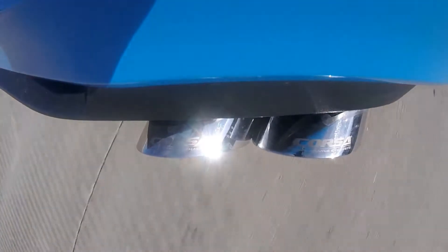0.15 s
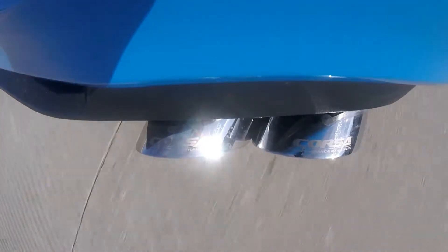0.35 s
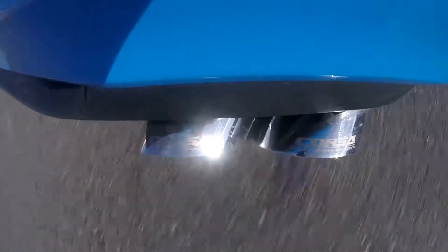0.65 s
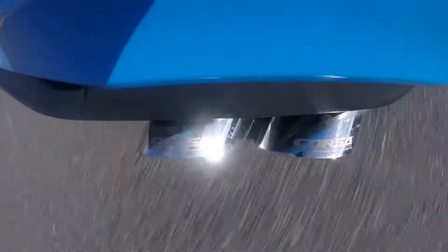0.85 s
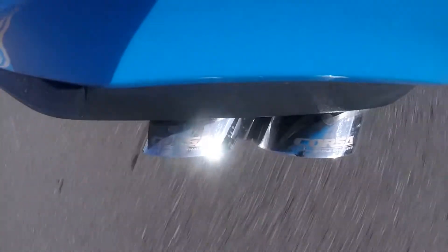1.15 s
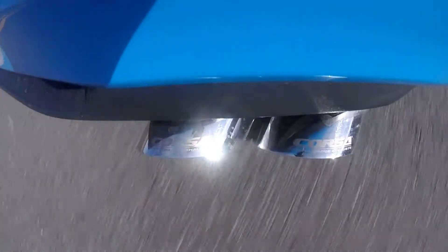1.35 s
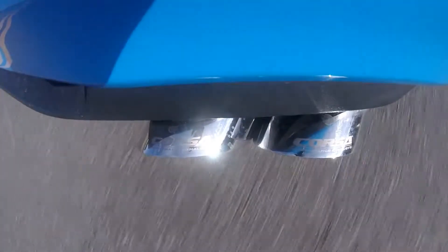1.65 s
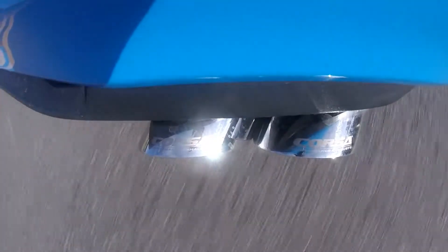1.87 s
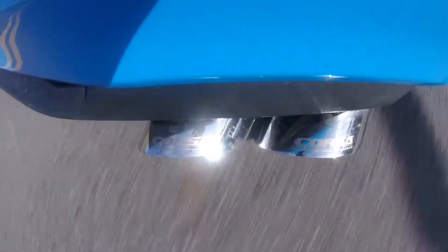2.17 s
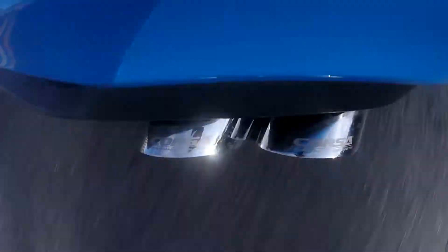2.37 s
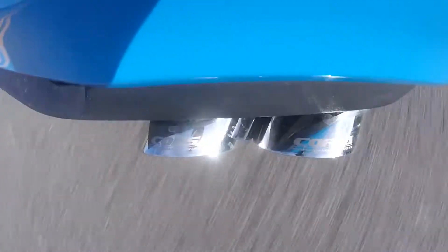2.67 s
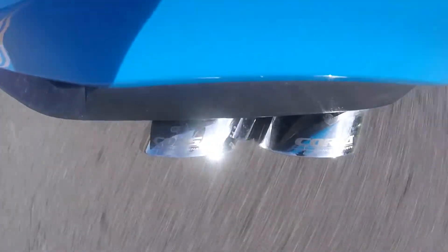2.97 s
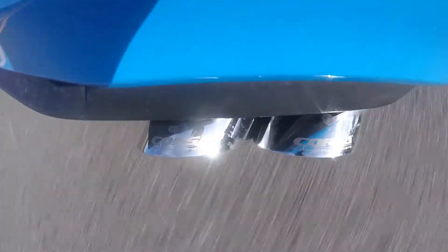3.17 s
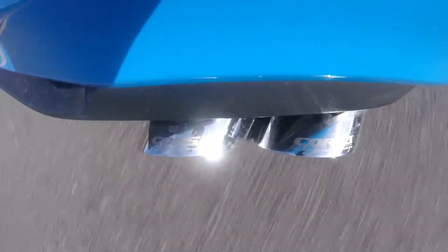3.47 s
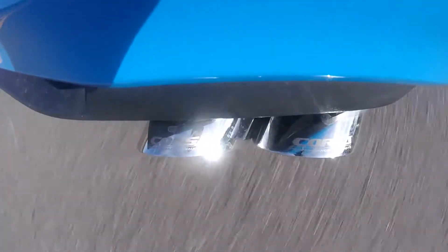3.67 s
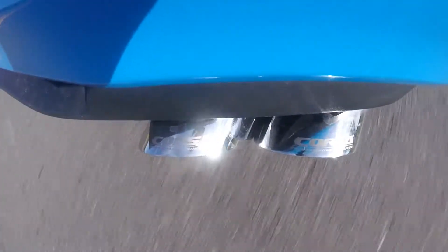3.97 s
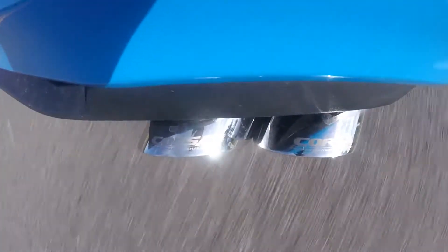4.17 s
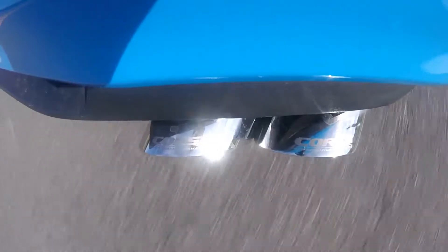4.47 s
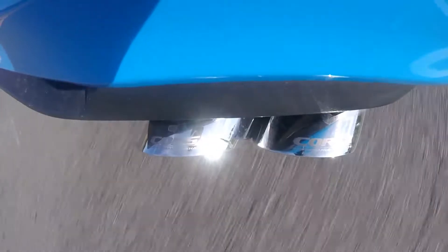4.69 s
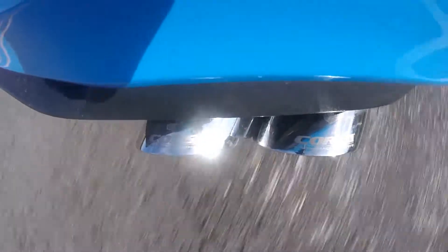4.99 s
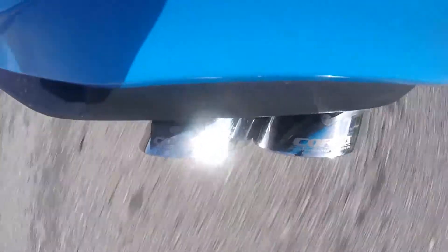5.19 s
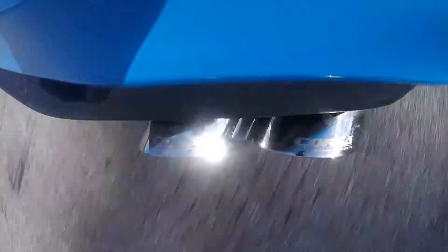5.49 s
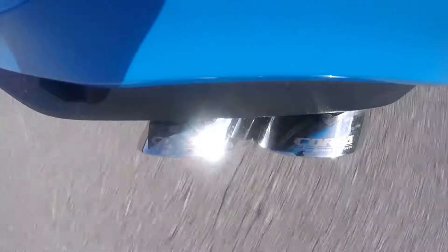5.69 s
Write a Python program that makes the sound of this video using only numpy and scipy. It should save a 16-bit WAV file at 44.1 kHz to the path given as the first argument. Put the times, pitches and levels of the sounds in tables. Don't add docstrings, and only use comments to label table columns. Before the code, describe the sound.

Outdoors on the road, a V8 exhaust heard very close and dry: a rising, tearing rasp with bright gas hiss, a sudden lift, loose stumbling pops, one brief throttle bark, a lull, then dense irregular crackling. From about three seconds it steadies into a throaty, lumpy drone that gradually slows, with low wind gusts and dull tyre roar around it.

```python
import sys
import numpy as np
from scipy import signal
from scipy.fft import rfft, irfft, next_fast_len
from scipy.io import wavfile
from scipy.ndimage import uniform_filter1d, map_coordinates

SR = 44100
rng = np.random.default_rng(int(sys.argv[2]) if len(sys.argv) > 2 else 0)


def attenuation_scalar(level_db):
    decades = np.asarray(level_db, float) / 20
    return 10 ** decades


def master(y):
    cut = np.clip(np.atleast_2d(y).T, -1, 1)
    pcm = np.round(cut * 32767)
    wavfile.write(sys.argv[1], SR, pcm.astype(np.int16))


N = 257544
TIME = np.arange(N) / SR
LIFT_S = .92

# (time [s], rate [Hz])
CYCLE_RATE = [(0, 35.948), (.8, 39.279), (1.3, 34.569), (1.4, 31.105), (1.5, 29.598), (1.6, 31.909),
              (1.7, 29.5), (1.82, 30.2), (1.9, 31.36), (2.0, 30.396), (2.5, 30.121), (2.8, 30.007),
              (3.05, 29.495), (3.2, 29.047), (3.5, 28.983), (4.75, 26.659), (5.1, 25.83), (5.84, 25.009)]
# (time [s], lead of the crank [ms])
CRANK_LEAD = [(3.2, 0), (3.28, -.7), (3.37, -.4), (3.45, 0), (3.61, 0), (3.75, .4), (3.97, 0), (4.33, 0),
              (4.5, .3), (4.75, .1), (4.9, .45), (5, .55), (5.057, .2), (5.135, -.9), (5.173, -.2), (5.21, .5),
              (5.25, .8), (5.3, .5), (5.36, 0)]
# (time [s], exhaust level [dB], gas flow as hiss level [dB])
LOAD = [(0, -18.5, -26.5), (.72, -19.5, -25.5), (.91, -19, -33.5), (.945, -27, -44.5), (1.05, -28, -56.5),
        (1.51, -27.5, -68), (1.58, -18, -51), (1.64, -13.5, -44.5), (1.8, -13, -42), (1.97, -21.5, -51),
        (2.56, -19.5, -58), (2.6, -15, -50.5), (2.78, -13.5, -53), (3.42, -13, -41.5), (4.15, -14, -49.5),
        (4.92, -12.5, -47), (5.03, -14.5, -46.5), (5.84, -14.5, -46.5)]
# (peak time [s], exhaust change [dB], hiss change [dB], decay time [s])
SURGES = [(1.093, 9, 18, 0.048), (1.328, 10.5, 18, 0.1), (1.431, 2.5, 6, 0.028), (1.69, -5.5, -7, 0.027),
          (1.72, 1.5, 9, 0.055), (1.79, -3.5, -2, 0.028), (2.081, 1.5, -5, 0.086), (2.813, 0.5, 13.5, 0.12),
          (2.928, -4.5, 3, 0.036), (3.119, -1.5, 7, 0.02), (3.222, 1.5, 5, 0.017), (3.249, -6.5, 1, 0.032),
          (5.068, 0.5, 2.5, 0.053)]
# (start [s], blend [s], firing pattern [0-12], timing scatter [firing gaps],
# front steepness [0 soft - 1 shock-like])
RUNNING = [(-1, .1, 0, .006, 1), (.81, .005, 1, .01, .9), (.915, .015, 2, .016, .15),
           (1.07, .08, 3, .01, .2), (1.32, .05, 4, .01, .2), (1.52, .05, 5, .012, .3),
           (1.69, .02, 6, .005, .8), (1.82, .07, 7, .008, .4), (1.95, .04, 8, .009, .1),
           (2.58, .04, 8.7, .1, .3), (3.2, .07, 9, .0012, .45), (3.5, 1.25, 11, .0018, .33),
           (4.84, .15, 11.9, .003, .65), (5.1, .15, 12, .001, .9)]

# (strength in tailpipe [dB], strength in muffler [dB], arrival lag [firing gaps])
FULL = [(-3, -0.6, .24), (4, 3, 0.16), (5, 5.5, .16), (1, -0.5, .28), (-8.5, -20, 0.068), (6.5, 6, .31),
        (-3, -1.24, .21), (2.5, 1.5, 0.12)]
EASE = [(-12, -12, .2)] * 8
CUT = [(-5.1, -4.9, .06), (-10.2, -7.1, -.22), (-4.6, -3.7, -.11), (-3.3, -3.3, .28), (-19.6, -36, .06),
       (-30, -17.3, -.02), (-1.2, -1.7, 0), (6.5, 6.6, -.05)]
COAST = [(-1, -2.5, .33), (-4, -3.5, 0.25), (-1.5, -2, 0.054), (1, 2, 0.19), (2, 1, 0.3), (-12, -15, 0.29),
         (-2, -2.5, 0.083), (1, 1, 0.0043)]
SAG = [(1.5, 0.5, -0.019), (-9.5, -4, 0.27), (1.5, 2, -0.12), (-0.5, 0.5, 0.28), (-1, -0.5, 0.29),
       (-12.5, -10.5, 0.18), (-4.5, 0.5, -0.18), (-7.5, -5.5, 0.13)]
CATCH = [(-8.5, -18.5, -0.053), (-7.5, -10.5, 0.062), (1.6, -0.5, -0.072), (-1, -3.5, 0.16),
         (-14, -38, -0.055), (-2, -11.5, 0.13), (-2, -5, -0.13), (-16.5, -10.5, 0.12)]
BLIP = [(-1, -1.3, .17), (0, -.3, .16), (1.2, .9, .14), (3, 2.5, .17), (.5, .2, .2), (-.7, -1, .2),
        (-.5, -.8, .14), (-1, -1.3, .15)]
FADE = [(-3.5, -2, -0.059), (-0.5, 0.5, 0.15), (-7.5, -6.5, -0.028), (2.5, 0.5, 0.16), (3, 1.5, 0.24),
        (2, 1.5, 0.19), (1.5, 0.5, 0.2), (-8.5, -5, -0.22)]
LIGHT = [(0.5, -1, 0.044), (-18.5, -8.5, .07), (-22.5, -8.5, -0.0054), (-1, -3, .06), (2.5, 5, .17),
         (-17, -8, -0.34), (-2, -5.5, -.06), (-8.5, -3.5, 0.19)]
PULL = [(.6, .7, -.03), (-17.6, -16, -.16), (-3, -3.2, -.37), (-5.7, -5.1, -.03), (.3, .1, .05),
        (.4, -.7, .36), (-6.4, -8.3, -.35), (.5, -.2, -.3)]
DRONE = [(-3, -1, -0.12), (-10, -12, -0.27), (-1.5, -3, -0.42), (-8, -5.5, -.03), (-4, -2.5, .03),
         (4.5, 3.5, .32), (-9.5, -12, -0.42), (1, 0.05, -.41)]
CRUISE = [(-2, -1.5, 0.084), (-10, -16, -0.48), (-3.5, -4.5, -.33), (-9, -4.5, -0.014), (-1.5, -0.5, 0.12),
          (3, 0.5, 0.35), (-13.5, -14.5, -.42), (-4, -6.5, -.52)]
BURBLE = [(2.5, 2.2, -.03), (-11.7, -10.9, -.26), (-5, -5.4, -.33), (-30, -16.3, -.06), (3.2, 2.9, .03),
          (-4.4, -7.6, .3), (-5, -6.6, -.48), (-7.2, -7.4, -.38)]

# (pressure peak time [s], strength [dB])
EASING = [(.8088, 7), (.8124, -3.5), (.8191, 1.6), (.8218, -.8), (.8247, -1), (.8284, -3), (.831, .8),
          (.8342, 6), (.8382, -3), (.8444, 1.6), (.8473, -.5), (.8504, .8), (.8542, -1), (.8568, -2.7),
          (.86, 3.2), (.864, -.8), (.8703, -2), (.8732, -3.7), (.8763, -1), (.8802, .2), (.886, 1.4),
          (.89, 0), (.8941, -4.8), (.9023, -.5), (.9062, .4), (.9121, 1.8), (.9163, .6), (.9205, -1)]
# (pressure peak time [s], strength [dB])
BANGS = [(.9284, -5), (.9548, -3), (.9641, 4), (1.0349, 7.5), (1.0449, -3), (1.0624, 3), (1.073, 4),
         (1.0769, 2), (1.0836, 1), (1.0898, -1.5), (1.1055, 3), (1.1174, -4), (1.1275, 3), (1.1552, 3),
         (1.1826, 5), (1.2438, 4), (1.2474, 4), (1.2571, 3), (1.276, 4), (1.2823, -4), (1.301, 4.5),
         (1.3049, 4), (1.3257, -3), (1.3302, 4.5), (1.3447, -4), (1.3599, 4.5), (1.3646, -3), (1.4111, 4),
         (1.4273, 5.5), (1.4606, 5), (1.4942, 7), (1.6093, 2), (1.6535, 3), (1.6613, 0), (1.6857, 5),
         (1.7098, 4.5), (1.7139, 2), (1.7185, 6.5), (1.7232, -1), (1.7271, 1), (1.7312, -2), (1.7523, 5),
         (1.7818, 3), (1.7861, 6.5), (1.8151, 2), (1.8193, 4.5), (1.8438, 4), (1.852, 5.5), (1.8716, -3),
         (1.8844, 3), (1.9205, 2), (1.9485, 3), (1.9856, -4), (2.0846, 11.5), (2.1175, 6), (3.2549, 4)]
# (pressure peak time [s], strength [dB])
CRACKLE = [(2.6133, 8.4), (2.6472, 3), (2.6763, 1.5), (2.6803, 1.7), (2.686, 1.0), (2.6968, 1.4),
           (2.7084, 4.6), (2.7217, 1.6), (2.7314, 1.0), (2.7359, 3.0), (2.7426, 4.8), (2.7474, 2.0),
           (2.7541, 0.0), (2.7591, 5.1), (2.7693, 2.6), (2.7766, 1.1), (2.7965, 1.3), (2.8055, 2.2),
           (2.8108, 3.8), (2.8154, 0.4), (2.8193, 4.1), (2.8242, 7.0), (2.8307, 4.4), (2.8386, 1.5),
           (2.8433, -0.2), (2.852, 0.9), (2.8758, 2.0), (2.8802, 4.5), (2.8861, 2.5), (2.9486, 2.9),
           (2.9536, 6.5), (2.9643, 2.8), (2.9816, 1.4), (2.987, 6.3), (3.0062, 2.0), (3.0159, 4.9),
           (3.0275, 0.3), (3.0322, 5.0), (3.0442, 5.2), (3.0491, 0.7), (3.0661, 1.8), (3.0705, -0.1),
           (3.0782, -0.1), (3.1012, 1.4), (3.1127, 6.0), (3.1172, 5.7), (3.1267, 2.3), (3.1332, 2.3),
           (3.1386, 0.1), (3.1475, 0.9), (3.1519, 2.6), (3.1633, 2.9), (3.1681, 1.0), (3.1807, 0.4),
           (3.1851, 5.0), (3.1909, 7), (3.2156, 1.3), (3.2207, 7.9)]
# (time [s], peak level [dB], treble
# level [dB])
POPS = [(1.0814, -28.5, -42), (1.1076, -41, -36), (1.303, -35.5, -45), (1.72, -37.5, -33),
        (1.7528, -29.5, -45.5), (2.816, -29.5, -44.5), (2.932, -37, -26), (3.118, -55, -30),
        (3.2078, -25, -62), (3.2188, -36, -37.5), (3.3602, -31, -45), (4.995, -44.5, -25.5),
        (5.8374, -63, -35)]

# (frequency [Hz], width [Hz], level [dB])
TAILPIPE = [(547, 158, 6.9), (651, 972, 7.8), (999, 1500, 1)]
MUFFLER = [(239, 101, 6), (469, 149, -6.6)]
# (gain [ratio], delay [s])
ECHOES = [(-.21, .00356), (.1, .00621)]
# (frequency [Hz], level [dB])
BUMPER = [(110, -3.5), (180, 0.5), (240, 0.5), (320, -2), (430, -2.5), (560, -1.5), (720, 2.5), (950, 1),
          (1300, -5)]
# (frequency [Hz], level [dB])
TIPS = [(110, -2.5), (180, -.5), (250, 0.01), (330, -4), (450, -5), (560, -1), (700, 5.5), (850, 2),
        (1000, -2), (1300, -4)]
# (time [s], share [0-1])
RINGING = [(0, 0.045), (.7, 0.085), (.9, 0.21), (1.2, .1), (1.55, 0.091), (1.68, .3), (1.72, 0.75),
           (1.9, 0.54), (2.0, .1), (2.55, .1), (2.7, .5), (3.1, 0.36), (3.4, 0.087), (4.3, .15),
           (4.9, 0.089), (5.84, 0.08)]

# (frequency [Hz], density [dB per Hz])
RASP = [(470, 2), (800, 7.5), (953, 1), (1170, 1), (1280, -6), (1430, 3), (1720, 2.5), (2140, -39),
        (2400, -39), (3120, -71), (5280, -120)]
SNAP = [(440, -21), (750, -1), (900, 3.5), (977, 9.5), (1070, -1), (1200, -0.5), (1300, 7), (1400, 5),
        (1830, -7), (2300, -31), (3500, -44), (4550, -83), (7700, -120)]
# (frequency [Hz], density [dB per Hz])
JET = [(1060, -26), (1800, 2.5), (2150, -6.5), (2330, -2), (2790, -6.5), (3230, -2.5), (3500, -6.5),
       (3920, -1.5), (4310, -10), (4770, -16), (6480, -19), (8420, -71.5), (14300, -120)]
DRAUGHT = [(1100, -30), (1800, -7), (2300, -14.5), (2700, -14), (3750, -16.5), (4570, -26.5), (5230, -33),
           (6500, -31), (6900, -50.5), (9000, -93)]
# (frequency [Hz], density [dB per Hz])
AIR = [(6300, -73), (6900, -3.5), (8000, 2), (9500, -6.5), (11300, -1), (12600, -7.5), (14000, -27.5),
       (15600, -6), (16500, -74)]
# (frequency [Hz], density [dB per Hz])
BUFFET = [(8.8, -37.5), (15, -8), (32, -2), (59, -5), (81, 1), (113, -14), (135, -5), (180, -23),
          (300, -120)]
ROAD = [(59, -36.5), (100, -13), (135, -33), (182, -25.5), (210, -6), (370, -7.5), (664, -2.5),
        (1080, -15.5), (3000, -32), (3900, -81.5), (6600, -120)]

# (time [s], level [dB])
WIND = [(0, -35), (.9, -38), (1.46, -31), (1.75, -38), (2.5, -35), (2.62, -27.5), (3.1, -25), (3.3, -34),
        (5.0, -27.5), (5.7, -39), (5.84, -34)]
# (peak time [s], rise over the wind [dB], width [s])
GUSTS = [(.16, 3, 0.16), (.49, 7, 0.081), (.67, 10.5, 0.063), (2.47, 5, 0.0252), (3.16, 5.5, 0.065),
         (3.36, 10, 0.085), (3.58, 8.5, 0.063), (4.0, 7, 0.089), (4.319, 5, 0.16), (4.791, -2, 0.029),
         (4.94, 5, 0.026), (5.119, 1.5, 0.032), (5.29, 7.5, 0.032)]
# (time [s], level [dB])
ROLLING = [
    (0, -38),
    (.9, -34),
    (1.1, -35),
    (2.6, -36),
    (3.2, -32),
    (3.5, -37),
    (5.84, -38),
]


def exhaust():
    front_full_s, front_part_s = .0009, .0012
    shock_full, shock_part, shock_steep = 1.1, .85, .8
    calm_timing = .004
    jet_lead = 20
    body_db, snap_db, jet_db, air_db = load()
    fired = np.array(firings())
    t, ring_db, boom_db = fired
    open_throttle = t < LIFT_S

    body = pipework(*fired[:, open_throttle], heat=1.14) + pipework(*fired[:, ~open_throttle], heat=0.95)
    ringing = np.clip(curves(RINGING)[0], 0, 1)
    body = (1 - ringing) * coloured(body, BUMPER) + ringing * coloured(body, TIPS)

    front = t + np.where(open_throttle, front_full_s, front_part_s)
    grows = np.where(open_throttle, shock_full, shock_part + shock_steep * running(t)[2])
    shock = pulses(front, attenuation_scalar(grows * np.maximum(ring_db, boom_db)))
    puff = np.abs(signal.fftconvolve(shock, attenuation_scalar(-60 * TIME[:900] / .014))[:N])
    _, timing, steep = running()
    calm = np.clip(1 - timing / calm_timing, 0, 1)
    gate = 2 - 1.4 * steep + 1.6 * calm + steady(puff)

    def hiss(spectrum):
        return steady(coloured(gate * rng.standard_normal(N), spectrum))

    def edge(spectrum, noise):
        return steady(causal(shock, spectrum)) * np.sqrt(1 - noise ** 2) + noise * hiss(spectrum)

    full_load = TIME < LIFT_S
    snap = np.where(full_load, edge(RASP, .15), edge(SNAP, .45 - .4 * steep - .1 * calm))
    full_jet = edge(JET, .48)
    part_jet = np.roll(edge(DRAUGHT, .98 - .22 * steep - .06 * calm), -jet_lead)
    jet = np.where(full_load, full_jet, part_jet)

    snap_db = snap_db + np.where(full_load, 0, 5 * (steep - .45))
    jet_db = np.maximum(jet_db, -62)
    air_db = air_db + 1.5 * wobble(14)
    return attenuation_scalar(body_db) * steady(body) + attenuation_scalar(snap_db) * snap + attenuation_scalar(jet_db) * jet + attenuation_scalar(air_db) * hiss(AIR)


def firings():
    start_cycle = -.141
    scatter_db, scatter_max_db = 9.5, 3
    misfire_db = -2.5
    bang_muffler_db, crackle_muffler_db = -.2, -.3
    hot_lead_s, lead_s = .0009, .0013

    gaps = 8 * (start_cycle + np.cumsum(curves(CYCLE_RATE)[0]) / SR)
    k = np.arange(int(gaps[0]), int(gaps[-1]) + 2)
    state, timing, _ = running(np.interp(k, gaps, TIME))
    patterns = np.transpose([FULL, EASE, CUT, COAST, SAG, CATCH, BLIP, FADE, LIGHT, PULL, DRONE, CRUISE, BURBLE])
    ring_db, boom_db, lag = [map_coordinates(column, [k % 8, state], order=1) for column in patterns]

    size_db = np.minimum(scatter_db * np.sqrt(timing), scatter_max_db)
    luck = rng.standard_normal((len(k), 3))
    ceiling = np.where(timing > .05, misfire_db, 20)
    ring_db = np.minimum(ring_db + size_db * luck[:, 0], ceiling)
    boom_db = np.minimum(boom_db + size_db * (.93 * luck[:, 0] + .3 * luck[:, 1]), ceiling)
    t = np.interp(k + lag + timing * luck[:, 2], gaps, TIME)
    t = t - curves(CRANK_LEAD, t)[0] / 1000

    s, db = np.transpose(EASING + BANGS + CRACKLE)
    share_db = np.repeat([bang_muffler_db, crackle_muffler_db], [len(EASING + BANGS), len(CRACKLE)])
    s = s - np.where(s < LIFT_S + hot_lead_s, hot_lead_s, lead_s)
    near = np.abs(t[:, None] - s).argmin(axis=0)
    hard = s, db, db + share_db
    return [np.append(np.delete(usual, near), extra) for usual, extra in zip((t, ring_db, boom_db), hard)]


def running(at=TIME):
    ends = [(s + blend, *state) for s, blend, *state in RUNNING]
    starts = [(new[0], *old[2:]) for old, new in zip(RUNNING, RUNNING[1:])]
    return curves(sorted(ends + starts), at)


def load():
    full_db, part_db = -27.5, -14.5
    body_db, jet_db = curves(LOAD)
    for s, more_db, hiss_db, decay_s in SURGES:
        shape = np.exp(-np.abs(TIME - s) / decay_s)
        body_db = body_db + more_db * shape
        jet_db = jet_db + hiss_db * shape
    under = jet_db - full_db
    rasp_db = -22 + 1.3 * under
    part_snap_db = jet_db + 7 + 0.41 * (body_db - part_db)
    snap_db = np.where(TIME < LIFT_S, rasp_db, part_snap_db)
    air_db = np.maximum(-55.5 + 1.4 * under, -73 + .4 * under)
    return body_db, snap_db, jet_db, air_db


def pipework(t, ring_db, boom_db, heat):
    ring = duct(TAILPIPE, chamber_hz=230.5, width_hz=89)
    boom = duct(MUFFLER, chamber_hz=470, width_hz=1270)

    def outlet(f):
        ends = 1 + sum(g * np.exp(-2j * np.pi * f / heat * s) for g, s in ECHOES)
        return ends / (1 + (118 / (f + 1)) ** 7) / (1 + (f / heat / 1150) ** 4)

    tailpipe = filtered(pulses(t, attenuation_scalar(ring_db - 7.4)), lambda f: ring(f / heat) * outlet(f))
    muffler = filtered(pulses(t, attenuation_scalar(boom_db - 4.3)), lambda f: boom(f / heat) * outlet(f))
    return tailpipe + muffler


def duct(modes, chamber_hz, width_hz):
    def pole(f, centre, width):
        return centre * centre - f * f + 1j * f * width

    def response(f):
        pipe = sum((-1) ** k * attenuation_scalar(db) * 1j * f * w / pole(f, c, w) for k, (c, w, db) in enumerate(modes))
        return pipe * chamber_hz ** 2 / pole(f, chamber_hz, width_hz)

    return response


def pops():
    low, top = np.zeros(N + 900), np.zeros(N + 900)
    t = TIME[:900]
    for s, db, top_db in POPS:
        at = min(round((s + .002) * SR), N - 60)
        burst = attenuation_scalar(db - 60 * t / .004) * rng.standard_normal(900)
        low[at:][:900] += burst
        top[at:][:900] += burst * attenuation_scalar(top_db)
    return attenuation_scalar(18.0) * coloured(low[:N], JET) + attenuation_scalar(9.5) * coloured(top[:N], AIR)


def wind():
    buffet = unit(attenuation_scalar(0.44 * wobble(11)) * coloured(rng.standard_normal(N), BUFFET))
    road = unit(coloured(rng.standard_normal(N), ROAD))
    gust_db = sum(db * np.exp(-((TIME - s) / width) ** 2) for s, db, width in GUSTS)
    buffet_db = curves(WIND)[0] + gust_db
    road_db = curves(ROLLING)[0] + 0.86 * wobble(0.43)
    return attenuation_scalar(buffet_db) * buffet + attenuation_scalar(road_db) * road


def unit(x):
    return x / np.sqrt(np.mean(x ** 2) + 1e-20)


def steady(x):
    power = uniform_filter1d(uniform_filter1d(x ** 2, size=3000), size=3000)
    return x / np.sqrt(np.abs(power) + 1e-20)


def curves(rows, at=TIME):
    s, *cols = np.transpose(rows)
    return [np.interp(at, s, c) for c in cols]


def pulses(times, sizes):
    at = np.clip(times * SR, 0, N)
    i = at.astype(int)
    early = np.bincount(i, sizes * (1 + i - at), N + 2)
    late = np.bincount(i + 1, sizes * (at - i), N + 2)
    return (early + late)[:N]


def wobble(rate):
    return map_coordinates(rng.standard_normal(int(N * rate / SR) + 4), [TIME * rate])


def filtered(x, response):
    m = next_fast_len(N + 8192)
    return irfft(rfft(x, m) * response(np.fft.rfftfreq(m, 1 / SR)), m)[:N]


def coloured(x, spectrum):
    f, db = np.transpose(spectrum)
    return filtered(x, lambda hz: attenuation_scalar(np.interp(np.log(hz + 1), np.log(f + 1), db)))


def causal(x, spectrum):
    f, db = np.transpose(spectrum)
    db = np.interp(np.log(np.fft.rfftfreq(4096, 1 / SR) + 1), np.log(f + 1), db)
    cepstrum = irfft(np.log(attenuation_scalar(db) + 1e-3))
    cepstrum[1:2048] *= 2
    cepstrum[2049:] = 0
    ring = irfft(np.exp(rfft(cepstrum)))[:2048]
    crest = np.argmax(np.diff(ring) < 0)
    return signal.fftconvolve(x, ring)[crest:][:N]


def scene():
    return (exhaust() + pops() + wind())[None]


def roll_off(x):
    return signal.sosfilt(signal.butter(12, 15830, fs=SR, output="sos"), x)


def record(dry):
    mix = dry / (1 + np.abs(dry / .95) ** 6) ** (1 / 6)
    return roll_off(mix)


dry = scene()
out = record(dry)
master(out)
```